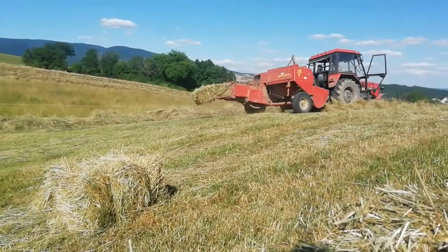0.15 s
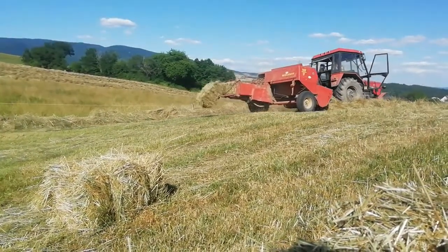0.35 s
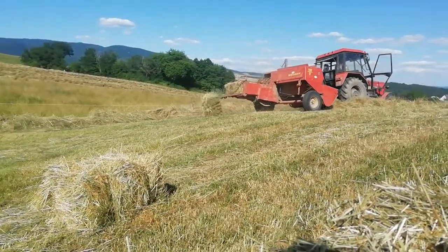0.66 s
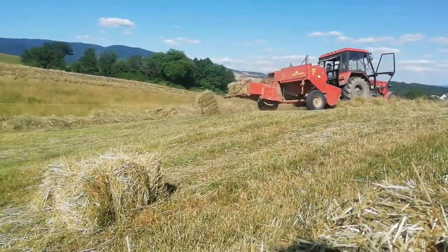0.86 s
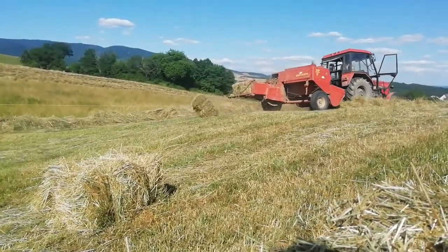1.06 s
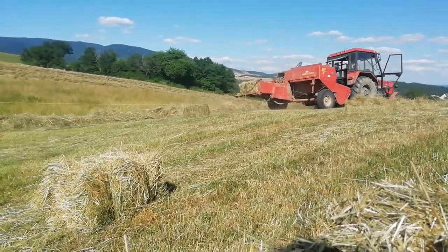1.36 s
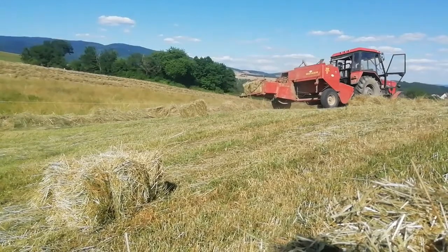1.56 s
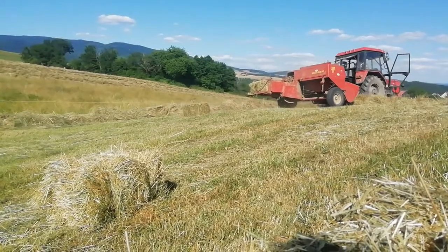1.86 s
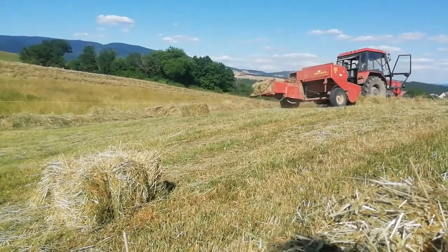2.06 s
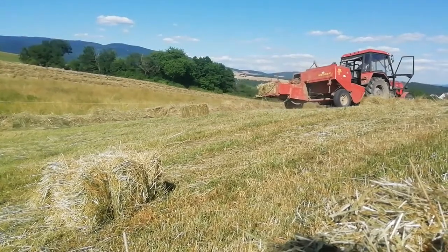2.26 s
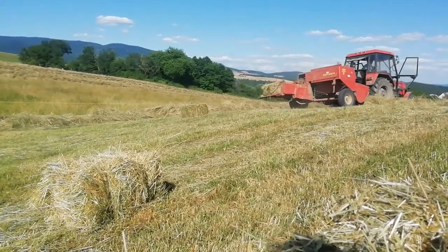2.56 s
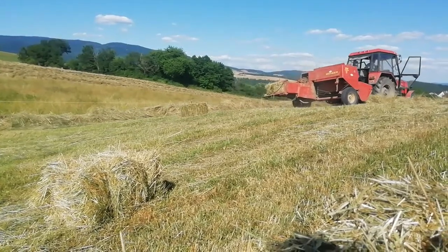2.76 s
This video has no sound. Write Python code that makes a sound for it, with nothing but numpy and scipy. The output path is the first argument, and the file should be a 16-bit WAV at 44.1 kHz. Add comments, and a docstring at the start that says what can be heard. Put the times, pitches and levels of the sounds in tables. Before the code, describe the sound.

A hay baler pulled by a tractor clatters, clanks and booms continuously over a low diesel hum, with bright straw snaps and faint wind, heard outdoors from some way off on a stereo phone microphone.

```python
"""A low diesel hum and a booming bale chamber come first, with tines, chains and straw clattering over them.
A tractor pulls a square baler across a stubble slope, some way off; two phone microphones hear it.
Sine firing orders hum, random knocks ring the chamber, and shaped noise and small resonators rattle and clank.
The clatter, tines, snaps, cracks and whirr also bounce off the ground; panels hum along, wind rumbles faintly.
The left microphone listens through a port that rings in the treble."""
import sys
import numpy as np
from scipy import signal
from scipy.fft import rfft, irfft, next_fast_len
from scipy.io import wavfile
from scipy.ndimage import uniform_filter1d

SR = 44100
rng = np.random.default_rng(int(sys.argv[2]) if len(sys.argv) > 2 else 0)


def nominal_scale(level):
    """Amplitude ratio for a level in decibels (scalar or array-like)."""
    x = np.asarray(level, float) / 20
    return 10 ** x


def dump_mix(stems):
    """Bounce the given channels to the path in sys.argv[1] as a 16-bit WAV at rate SR."""
    frames = np.atleast_2d(stems).T  # one column per channel
    limited = np.clip(frames, -1, 1)  # hard clip at full scale
    pcm = np.round(limited * 32767).astype(np.int16)
    wavfile.write(sys.argv[1], SR, pcm)


N = 128331
SIZE = next_fast_len(N + SR // 4)
HZ = np.arange(SIZE // 2 + 1) * SR / SIZE + 1e-3   # frequency grid, kept off zero for the logarithms


def rms_one(x):
    """Scale to rms 1."""
    return x / np.sqrt(np.mean(x ** 2) + 1e-20)


def in_time(rows):
    """Columns joined by straight lines in time."""
    s, *columns = np.transpose(rows)
    return [np.interp(np.arange(N) / SR, s, column) for column in columns]


def at_hz(points):
    """A spectrum table read on the frequency grid, straight over log frequency."""
    hz, value = np.transpose(points)
    return np.interp(np.log(HZ), np.log(hz), value)


def shape(x, gain):
    """Filter by a gain per frequency."""
    return irfft(rfft(x, SIZE) * gain, SIZE)[..., :N]


def noise():
    """Two unrelated draws: the direct sound and its scattered twin."""
    return rng.standard_normal((2, N))


def drift(rate_hz):
    """Slow random wander of spread 1: twice low-passed noise, drawn at every 40th sample."""
    r = np.exp(-2 * np.pi * rate_hz * 40 / SR)
    slow = signal.lfilter([1], [1, -2 * r, r * r], rng.standard_normal(N // 40 + 2002))
    slow = rms_one(slow[2000:])   # the filter has settled by here
    return np.interp(np.arange(N) / 40, np.arange(len(slow)), slow)


def ring(x, hz, t60):
    """A damped resonance: a unit click sets a sine of height 1 ringing."""
    r = nominal_scale(-60 / (t60 * SR))
    w = 2 * np.pi * hz / SR
    return signal.lfilter([0, np.sin(w)], [1, -2 * r * np.cos(w), r * r], x + 1e-18)


def clicks(per_s, spread_db):
    """Random contacts of uneven size."""
    size = nominal_scale(spread_db * np.minimum(rng.exponential(1, N), 4))
    return size * (rng.random(N) < per_s / SR)


# The diesel's firing. Each row: time in seconds, firing rate in Hz, level in dB before the order's own.
FIRING = [(0.0, 56.7, -30), (0.03, 52.56, -38), (0.44, 53.1, -31), (0.73, 53.13, -38.5), (0.74, 52.6, -51),
          (0.85, 53.1, -32), (0.89, 54.14, -52), (0.94, 53.6, -32.5), (1.3, 53.2, -34.5), (1.54, 52.3, -44),
          (1.56, 51.3, -63), (1.58, 56.1, -40), (1.73, 52.72, -43), (1.94, 53.03, -31), (2.37, 53.1, -47),
          (2.78, 52.9, -30), (2.88, 52.74, -46), (2.91, 52.5, -20)]
# Its tones. Each row: multiple of the firing rate, level in dB relative to the firing level.
FIRING_ORDERS = [(1, -2), (2, -10.5), (3, -7.5), (4, -14.5), (5, -24.5)]


def engine():
    """The low firing orders as clean tones on one phase; those above the first waver in level."""
    hz, db = in_time(FIRING)
    turn = 2 * np.pi * np.cumsum(hz) / SR
    hum = np.zeros(N)
    for k, order_db in FIRING_ORDERS:
        waver_db = 2.5 * drift(5) if k > 1 else 0
        hum += nominal_scale(db + order_db + waver_db) * np.sin(k * turn + k)
    return np.sqrt(2) * hum   # sine rms to peak


# Boom of the bale chamber. Each row: time in seconds, then the levels in dB of its deep, middle and upper modes.
BOOM_LEVELS = [(0.0, -22, -18, -31), (0.03, -28, -22.5, -27.5), (0.06, -37, -30.5, -41),
               (0.15, -41, -29, -37), (0.27, -31.5, -44, -33.5), (0.31, -30, -20.5, -48),
               (0.4, -25, -20, -35), (0.44, -38, -26, -34), (0.52, -35, -48, -38), (0.7, -35.5, -27, -37),
               (0.74, -22.5, -30.5, -25.5), (0.79, -34.5, -25, -26), (0.92, -39, -39, -37),
               (0.98, -33, -43, -40), (1.03, -31, -21, -32), (1.06, -33.5, -35, -39.5),
               (1.35, -44, -36, -36.5), (1.38, -35.5, -36, -41), (1.5, -32.5, -33, -32),
               (1.53, -36, -32.5, -30.5), (1.69, -37.5, -37, -34.5), (1.9, -30, -18, -31.5),
               (1.99, -23, -38, -37), (2.04, -32.5, -37, -41.5), (2.32, -29.5, -24.5, -29),
               (2.35, -35, -49, -30.5), (2.48, -40, -35.5, -40.5), (2.61, -27, -28, -36),
               (2.89, -36, -47.5, -38.5), (2.91, -41, -37, -31)]
# Tone of the boom. Each row: frequency in Hz, relative level in dB, before a further tilt of 3 dB per octave.
BOOM_TONE = [(36, -27), (62, -14.5), (76, -8.5), (118, 2), (151, 1.5), (226, -6.5), (265, -8), (345, -21.5),
             (388, -62.5), (450, -31.5), (580, -47), (990, -120)]


def boom():
    """Loose knocks set the low panel modes of the chamber ringing, in three groups."""
    knocks = clicks(per_s=700, spread_db=2.0) * rng.choice([-1, 1], N)
    dealt = rng.integers(0, 18, size=N)   # each knock strikes one mode
    groups = np.zeros((3, N))
    for k, hz in enumerate(np.geomspace(62, 450, num=18)):
        group = np.searchsorted((125, 200), hz)   # Hz where deep, middle and upper modes part
        t60 = 11.0 / hz   # eleven cycles
        groups[group] += ring(knocks * (dealt == k), hz, t60) * np.sqrt(hz)
    groups = shape(groups, nominal_scale(at_hz(BOOM_TONE)) * np.sqrt(HZ))
    # level out each group, so that the table alone sets the swells
    even = groups / np.sqrt(uniform_filter1d(groups ** 2, size=4000) + 1e-12)
    levels = nominal_scale(np.array(in_time(BOOM_LEVELS)))
    direct = (levels * even).sum(axis=0)
    twin = (levels * even[:, ::-1]).sum(axis=0)   # the knocks backwards, under the same swells
    return np.array([direct, twin])


# Clatter of tines, chains and straw. Each row: time in seconds, level in dB.
CLATTER_LEVELS = [(0.0, -32.5), (0.02, -36.5), (0.03, -38.5), (0.12, -39), (0.14, -33), (0.15, -38.5),
                  (0.19, -40), (0.21, -36), (0.27, -38.5), (0.28, -33), (0.36, -40), (0.65, -44.5),
                  (0.66, -39.5), (0.7, -40), (0.73, -31.5), (0.79, -38), (0.81, -32.5), (0.89, -45.5),
                  (0.96, -45.5), (0.97, -34.5), (1.02, -47), (1.04, -32), (1.12, -43), (1.34, -51),
                  (1.43, -36), (1.7, -50.5), (1.74, -40.5), (1.93, -41.5), (2.07, -50), (2.3, -37.5),
                  (2.48, -51.5), (2.49, -45), (2.57, -36), (2.66, -50), (2.88, -51), (2.91, -43)]
# Tone of that clatter. Each row: frequency in Hz, relative level in dB per Hz.
CLATTER_TONE = [(210, -26), (350, 1.5), (423, -18.5), (466, -4), (572, -11), (865, -7.5), (1030, -14.5),
                (1440, -2), (1710, -11), (1940, -5), (2240, -10.5), (2580, -10), (2930, -15), (3720, -7),
                (6190, -17), (7500, -12.5), (8200, -5.5), (9500, -11.5), (10100, -18.5), (12300, -29.5),
                (13600, -33), (15500, -44)]


def clatter():
    """Short dying rattles in quick succession over straw hiss."""
    tick_t60_s, tick_share = 0.074, 0.44
    r = nominal_scale(-60 / (tick_t60_s * SR))
    ticks = rms_one(signal.lfilter([1], [1, -r], clicks(per_s=180, spread_db=5)))
    rattle = noise() * (tick_share * ticks + 1 - tick_share)
    return nominal_scale(in_time(CLATTER_LEVELS)[0]) * rms_one(shape(rattle, nominal_scale(at_hz(CLATTER_TONE))))


def tines():
    """Small steel parts struck at random, each ringing briefly at a pitch of its own, in the clatter's tone."""
    hits = clicks(per_s=1200, spread_db=3.0)
    dealt = rng.integers(0, 30, size=(2, N))   # each hit strikes one part
    pitches = np.geomspace(1000, 7000, num=30) * rng.uniform(.97, 1.03, size=30)
    rings = np.zeros((2, N))
    for k, hz in enumerate(pitches):
        rings += ring(hits * (dealt == k), hz, t60=.022) * np.sqrt(hz)
    level_db = in_time(CLATTER_LEVELS)[0] - 4   # 4 dB under the clatter
    return nominal_scale(level_db) * rms_one(shape(rings, nominal_scale(at_hz(CLATTER_TONE))))


# Clanks. Each row: start in seconds, nominal peak in dB, ringing pitch in Hz, t60 in seconds of the rattle
# that drives the ring, crack level in dB relative to the nominal peak.
CLANK_BLOWS = [(0.013, -16.5, 3770, 0.058, -19), (0.05, -37.5, 1400, 0.12, 3),
               (0.131, -20, 3860, 0.067, -11.5), (0.2115, -19, 3860, 0.042, -9),
               (0.2779, -24, 3645, 0.14, -5), (0.3304, -38, 1910, 0.17, 3), (0.3605, -20, 1948, 0.17, -18),
               (0.6548, -24, 2620, 0.048, -5.5), (0.7183, -31.5, 3560, 0.33, -11),
               (0.8005, -26.5, 1480, 0.17, -8), (0.8406, -20, 1380, 0.095, -16),
               (0.9716, -17, 1434, 0.12, -10.5), (1.0376, -26, 2600, 0.25, -2),
               (1.0865, -30, 1425, 0.36, -4), (1.239, -37, 1580, 0.13, 1), (1.3198, -27, 2010, 0.12, -29),
               (1.413, -27.5, 1460, 0.13, -8), (1.589, -36, 1490, 0.082, 0.5),
               (1.731, -25.5, 3900, 0.12, -7.5), (1.7985, -30.5, 1595, 0.14, -12),
               (1.863, -35.5, 1550, 0.16, 2.5), (2.0057, -25.5, 1992, 0.16, -24),
               (2.1909, -32, 1374, 0.17, -20), (2.2348, -26.5, 1592, 0.24, -6),
               (2.4028, -32, 1417, 0.15, -23), (2.448, -31, 1965, 0.12, -13),
               (2.5021, -24.5, 1500, 0.097, -7), (2.5531, -32, 1940, 0.24, -1),
               (2.6989, -56, 1629, 0.11, -9), (2.8943, -50, 1610, 0.12, -8)]
# Tone of the cracks. Each row: frequency in Hz, relative level in dB per Hz.
CRACK_TONE = [(290, -18), (500, 5), (1530, 5), (3740, 12.5), (5210, 4), (8370, 3.5), (8860, 15),
              (15500, -73)]


def clanks():
    """Each blow rattles at its pitch and throws a broad dying crack; returns rings and cracks apart."""
    crack_t60_s, crack_rise_s = 0.085, .0005
    t = np.arange(SR // 4) / SR
    rings, blows = np.zeros((2, N + SR)), np.zeros(N + SR)
    for s, db, hz, t60, crack_db in CLANK_BLOWS:
        i = int(s * SR)
        attack = 1 + 1.5 * np.exp(-t / 0.0012)
        rattle = attack * nominal_scale(-60 * t / t60) * rng.standard_normal((2, len(t)))
        pair = ring(rattle, hz, .04) + .5 * ring(rattle, hz * 1.025, .03)
        rings[:, i:i + len(t)] += nominal_scale(db - 5.5) * pair / np.abs(pair).max()
        dying = nominal_scale(db + crack_db - 60 * t / crack_t60_s)
        blows[i:i + len(t)] += dying * (1 - np.exp(-t / crack_rise_s))
    crack = rms_one(shape(noise(), nominal_scale(at_hz(CRACK_TONE))))
    return rings[:, :N], blows[:N] * crack


# Bright snaps of chain and straw. Each row: start in seconds, nominal peak in dB, t60 in seconds.
SNAP_PUFFS = [(0.0504, -28, 0.072), (0.2124, -48, 0.048), (0.276, -22, 0.06), (0.3305, -23.5, 0.047),
              (0.405, -36, 0.048), (0.4994, -31, 0.097), (0.6475, -26, 0.075), (0.7098, -30, 0.061),
              (0.9712, -33.5, 0.064), (1.0276, -28, 0.06), (1.1587, -27.5, 0.097), (1.2989, -31, 0.06),
              (1.3932, -25, 0.06), (1.4706, -27.5, 0.12), (1.583, -28, 0.074), (1.7644, -30, 0.082),
              (1.8532, -37, 0.06), (2.176, -27.5, 0.054), (2.222, -24.5, 0.06), (2.2694, -25.5, 0.086),
              (2.3384, -27.5, 0.077), (2.45, -47, 0.039), (2.499, -30, 0.06), (2.7016, -25.5, 0.052),
              (2.821, -36, 0.072), (2.8888, -27.5, 0.06)]
# Tone of the snaps. Each row: frequency in Hz, relative level in dB per Hz.
SNAP_TONE = [(3000, -37), (5000, -14), (7000, -16), (8500, 3), (10000, -6), (12300, -34), (13600, -22),
             (15600, -40)]


def snaps():
    """Short dying puffs of treble noise."""
    t, puffs = np.arange(SR // 4) / SR, np.zeros(N + SR)
    for s, db, t60 in SNAP_PUFFS:
        i = int(s * SR)
        dying = nominal_scale(db - 6 - 60 * t / t60)
        puffs[i:i + len(t)] += dying * (1 - np.exp(-t / 0.00046))
    return puffs[:N] * rms_one(shape(noise(), nominal_scale(at_hz(SNAP_TONE))))


# Panels that hum along. Each row: time in seconds, then one level in dB for each of the six resonances,
# before a common cut.
PANEL_LEVELS = [(0.0, -56, -55, -58, -41, -38, -37), (0.12, -53, -50, -46, -50, -61, -65),
                (0.31, -54, -55, -42, -34, -47, -32), (0.36, -48, -47, -40, -42, -62, -64),
                (0.47, -53, -49, -52, -65, -65, -44), (0.63, -55, -58, -61, -64, -68, -59),
                (0.65, -52, -46.5, -43, -59, -49, -51), (0.8, -53, -40, -41, -42, -40, -51),
                (0.92, -58, -58, -63, -43, -60, -75), (0.99, -45, -52, -27.5, -53, -41, -35),
                (1.04, -45, -51, -44, -44, -45, -42), (1.18, -56, -54, -43, -46, -65, -63),
                (1.37, -47.5, -54, -63, -49, -62, -68), (1.42, -57, -51, -46, -54, -58, -49),
                (1.54, -49, -43, -44, -39.5, -58, -47), (1.66, -67, -62, -63, -65, -58, -74),
                (1.81, -47, -46, -34.5, -43, -40.5, -36), (1.86, -52, -54, -44, -60, -46, -51),
                (1.99, -52, -58, -64, -54, -63, -53), (2.19, -51.5, -56, -44, -66, -69, -62),
                (2.29, -62, -42, -40, -44, -44, -44), (2.38, -70, -60, -46, -52, -61, -48),
                (2.46, -67, -67, -41.5, -37, -66, -58), (2.52, -39, -57, -40.5, -38, -58, -56),
                (2.58, -45, -48, -37.5, -68, -48, -40), (2.69, -54, -53, -56, -53, -62, -67),
                (2.88, -54, -69, -70, -55, -58, -61), (2.91, -50, -47, -50, -54, -62, -56)]
# Those resonances. Each row: pitch in Hz, t60 in seconds.
PANEL_RESONANCES = [(500, .045), (797, .025), (1430, .03), (1960, .05), (2600, .03), (3790, .025)]


def panels():
    """Noise twice through each panel resonance, the second time tuned slightly higher."""
    hum = np.zeros((2, N))
    for db, (hz, t60) in zip(in_time(PANEL_LEVELS), PANEL_RESONANCES):
        once = ring(noise(), hz, t60)
        hum += nominal_scale(db - 5.5) * rms_one(ring(once, hz * 1.02, t60))
    return hum


# Whirr of fan and gears. Each row: frequency in Hz, relative level in dB per Hz.
WHIRR_TONE = [(210, -22), (350, 0), (430, -6.5), (800, -8), (1060, -8.5), (1390, -2.5), (2010, -7.5),
              (2280, -15.5), (3840, -9.5), (6290, -20), (7500, -14.5), (8000, -1.5), (8600, 0.5),
              (9500, -3), (10000, -16), (11200, -21), (12300, -34), (13600, -27), (15500, -41)]


def whirr():
    """Steady noise in overlapping octave bands, each flickering on its own."""
    level_db, flicker_db = -41, 3.5
    spectrum = rfft(noise(), SIZE) * nominal_scale(at_hz(WHIRR_TONE))
    out = np.zeros((2, N))
    for hz in 250 * 2 ** np.arange(7):
        weight = np.clip(1 - np.abs(np.log2(HZ / hz)), 0, 1)   # falls to nothing an octave away
        band = irfft(spectrum * weight, SIZE)[:, :N]
        out += band * nominal_scale(flicker_db * drift(60))
    return nominal_scale(level_db) * rms_one(out)


def wind():
    """Faint deep rumble on the ports: noise around 36 Hz, wandering slowly in level."""
    rumble = (HZ / 30) ** 3 / (1 + (HZ / 36) ** 6)
    return nominal_scale(-53 + 2.8 * drift(2.5)) * rms_one(shape(noise(), rumble))


def ground_bounce():
    """Gain of the direct sound plus a later, duller, phase-turned copy off the ground, above 400 Hz."""
    delay_s, turn_cycles, share, cut_hz = 0.001666, 0.31, 0.3, 4800
    strength = share / (1 + (HZ / cut_hz) ** 2) * (HZ > 400)
    gain = 1 + strength * np.exp(-2j * np.pi * (HZ * delay_s - turn_cycles))
    return gain / 1.199


# Left microphone against the right; used above 400 Hz only. Each row: frequency in Hz, left over right in dB.
PORT_DIFFERENCE = [(400, 0), (770, -3.5), (1170, .5), (1430, 0), (1960, 9), (2300, 0), (2600, 6),
                   (3200, -2), (3800, 0), (4100, 10), (4800, 0), (5400, 10), (5900, 13), (6250, 3),
                   (6600, 19), (7400, 19), (8500, 26), (9500, 25), (10300, 21), (11000, 16), (12300, 12),
                   (13600, 15), (15000, 2)]
# How alike the two microphones hear. Each row: frequency in Hz, likeness from 0 (unrelated) to 1 (same).
PORT_LIKENESS = [(60, .998), (200, .985), (380, .95), (700, .92), (1290, .92), (2380, .7), (4400, .5),
                 (8120, .4), (15000, .1)]


def microphones(direct, twin):
    """Left hears the direct sound slightly late; right mixes in the twin wherever the two are less alike."""
    left_lag_s = .00005
    alike = at_hz(PORT_LIKENESS)
    ratio = nominal_scale(-at_hz(PORT_DIFFERENCE) * (HZ > 400))   # right over left
    left_gain = 2 / np.sqrt(1 + ratio ** 2 + 2 * alike * ratio)   # keeps the mean of both level, lag aside
    right_gain = left_gain * ratio
    left = shape(direct, left_gain * np.exp(-2j * np.pi * HZ * left_lag_s))
    right = shape(direct, right_gain * alike) + shape(twin, right_gain * np.sqrt(1 - alike ** 2))
    return np.array([left, right])


def scene():
    """Sources, ground bounce, then the two microphone ports."""
    rings, cracks = clanks()
    bounced = shape(clatter() + tines() + snaps() + whirr() + cracks, ground_bounce())
    direct, twin = boom() + wind() + panels() + rings + bounced
    return microphones(direct + engine(), twin)


def band_limit(x):
    """A steep low-pass at the top of the band."""
    return signal.sosfilt(signal.butter(12, 15680, fs=SR, output="sos"), x)


def record(dry):
    """The two microphone signals as the phone keeps them."""
    return band_limit(dry)


dry = scene()
out = record(dry)
dump_mix(out)
```